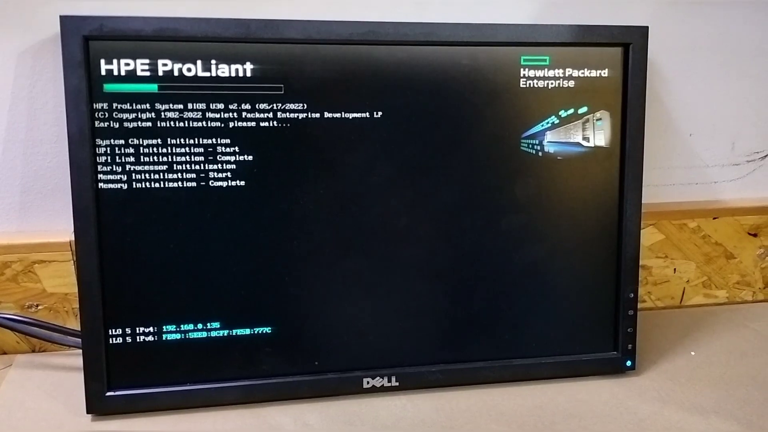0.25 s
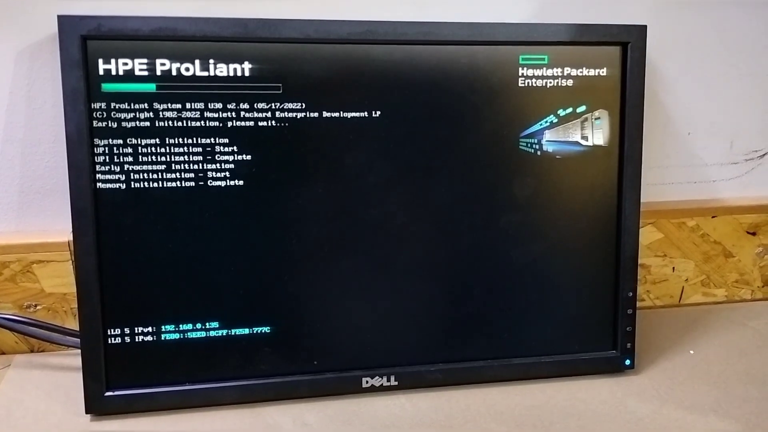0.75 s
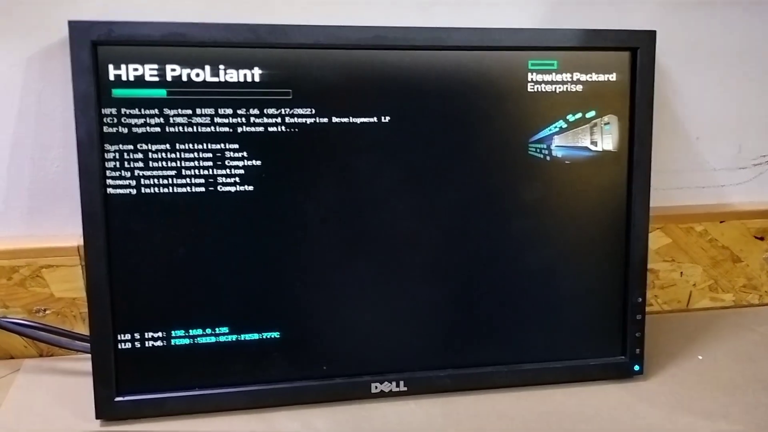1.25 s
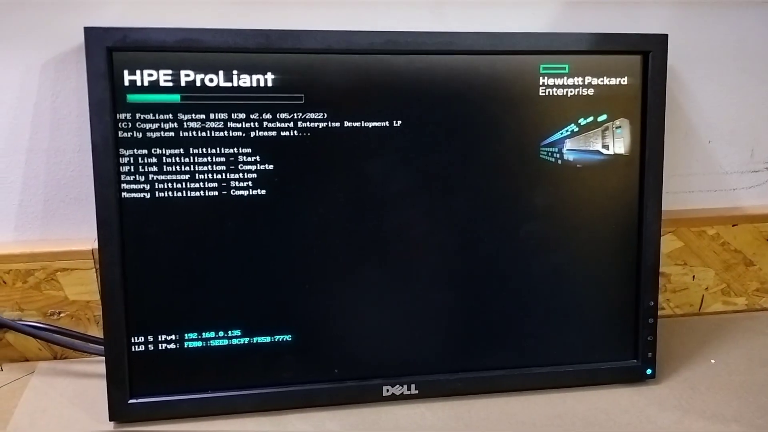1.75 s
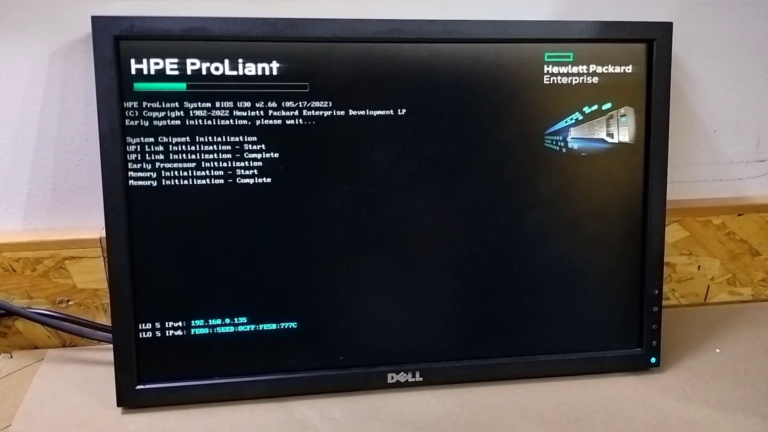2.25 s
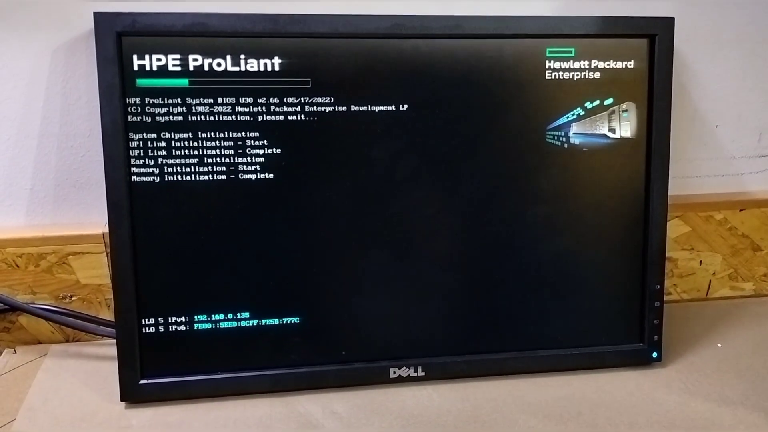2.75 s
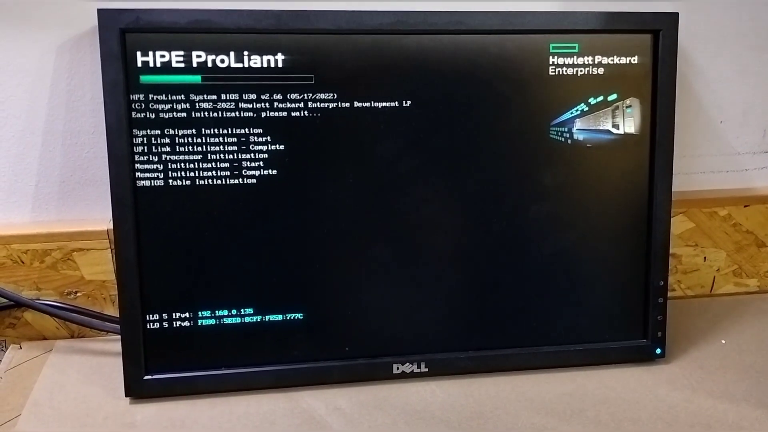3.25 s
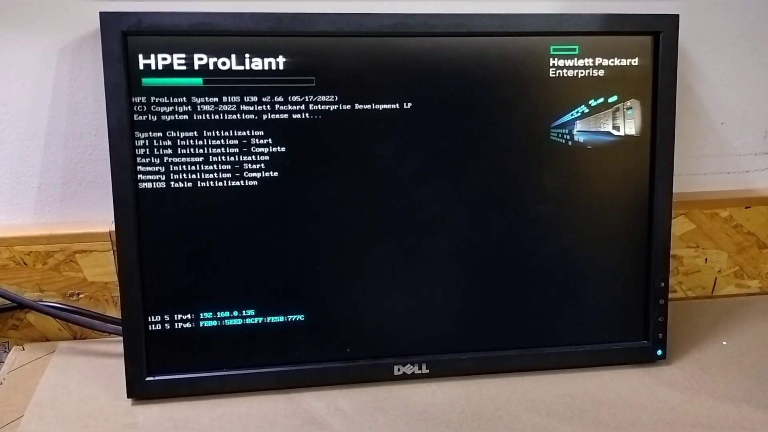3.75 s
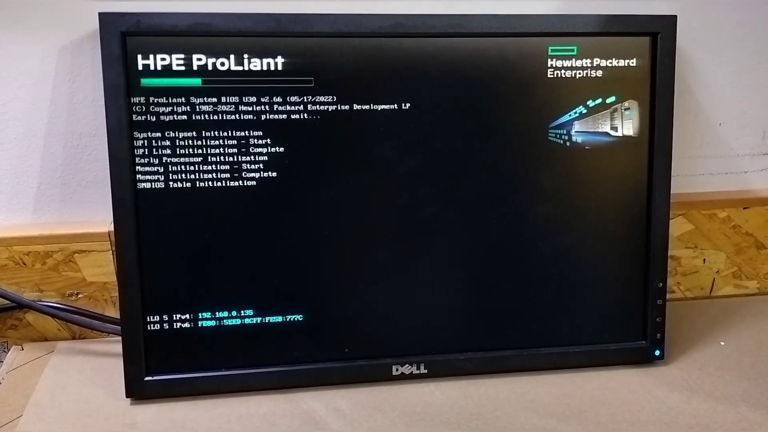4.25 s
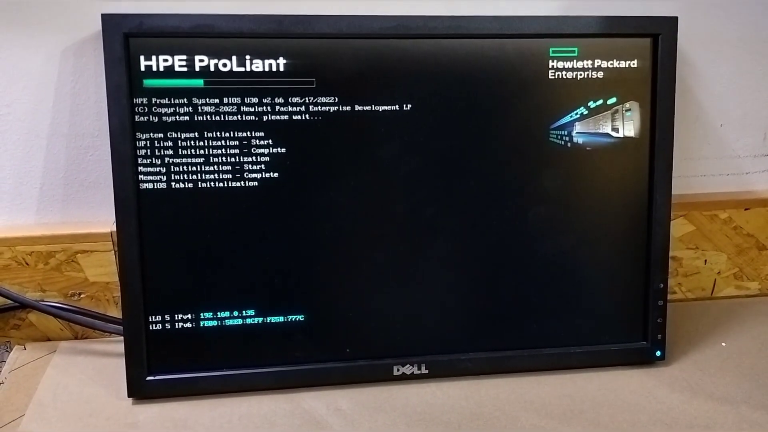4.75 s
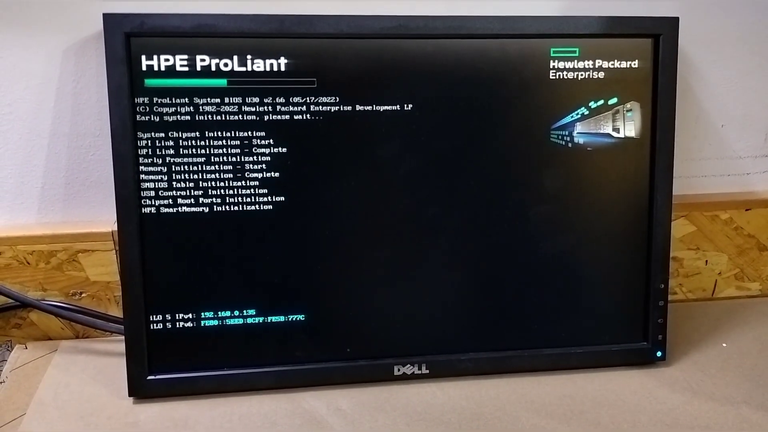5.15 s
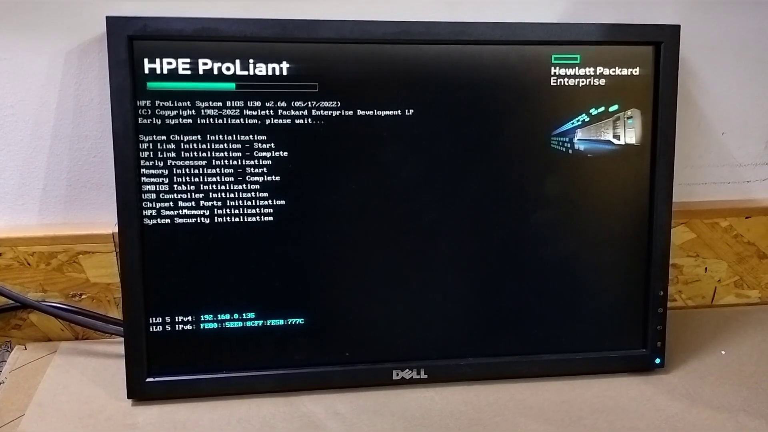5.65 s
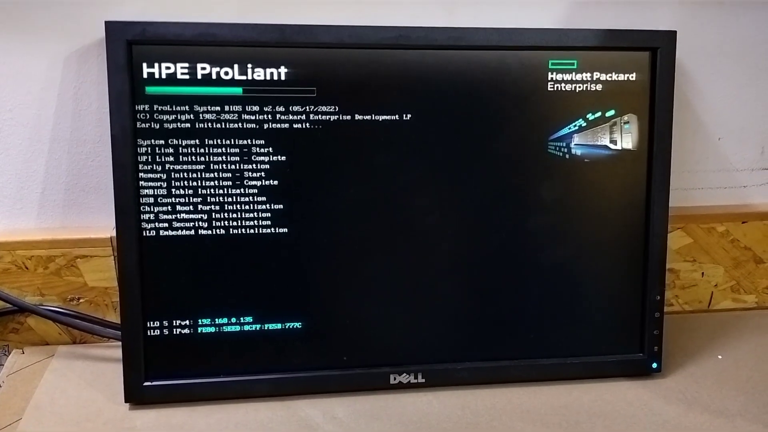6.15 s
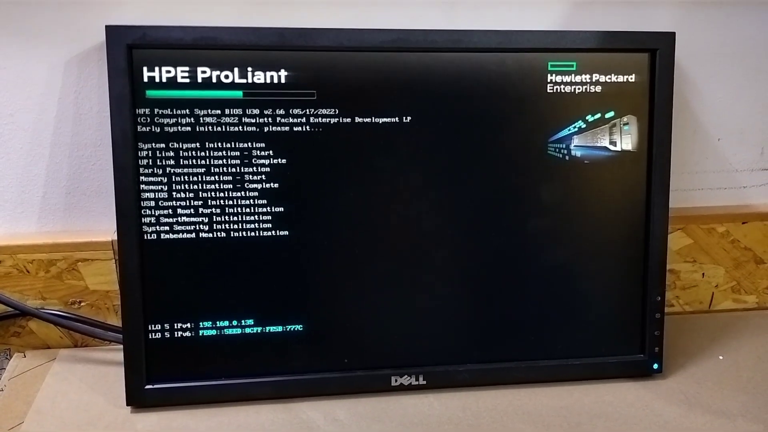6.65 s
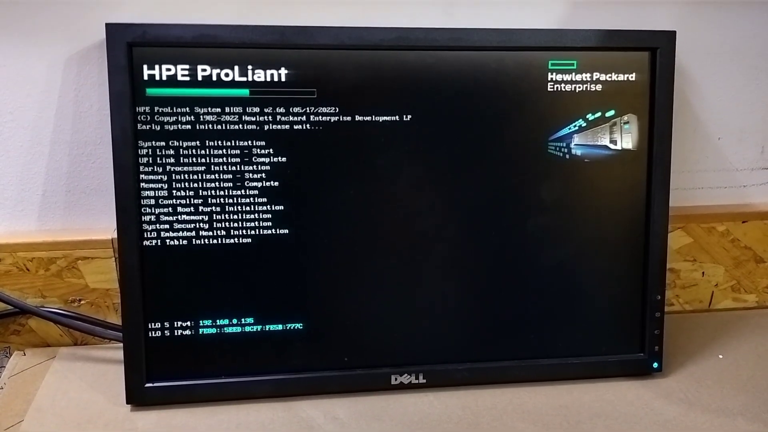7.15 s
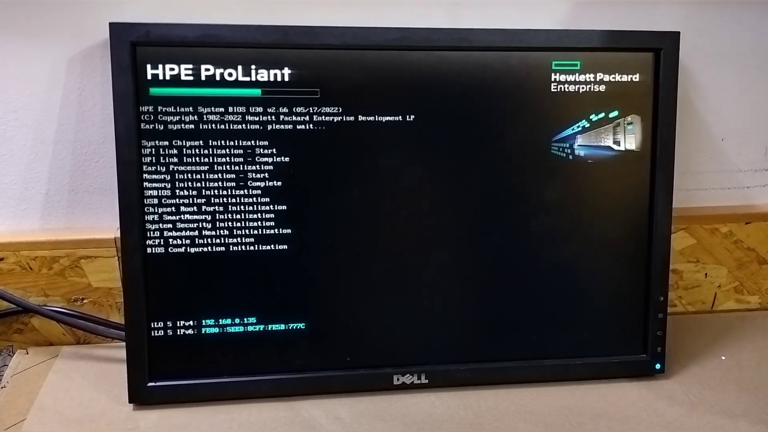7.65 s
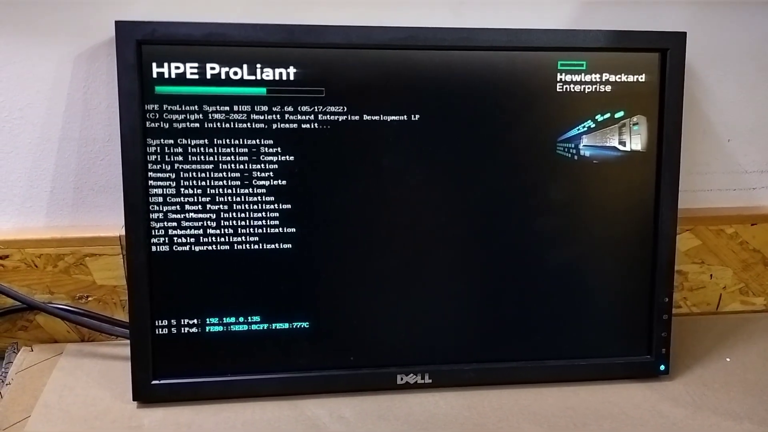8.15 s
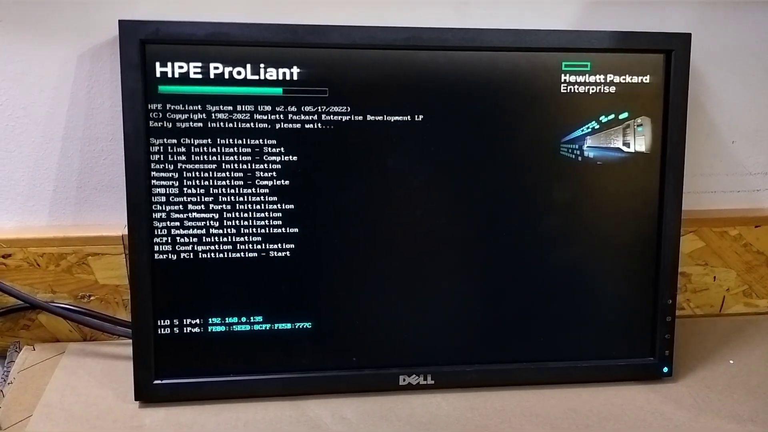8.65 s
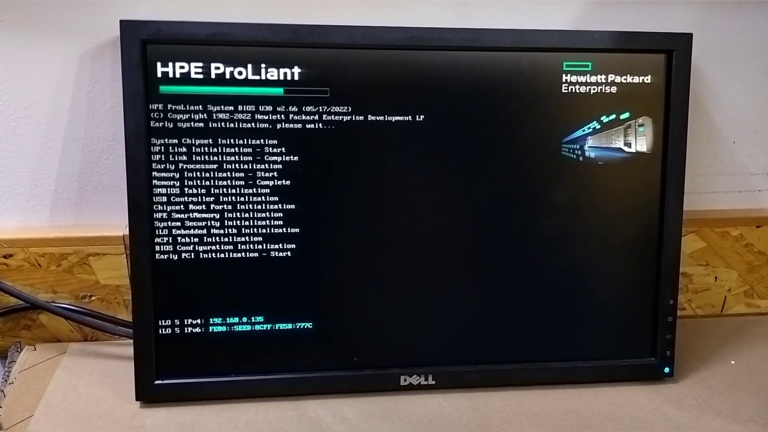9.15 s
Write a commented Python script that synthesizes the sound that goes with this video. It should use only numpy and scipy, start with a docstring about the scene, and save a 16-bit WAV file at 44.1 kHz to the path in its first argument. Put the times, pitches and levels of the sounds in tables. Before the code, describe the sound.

A constant mid-pitched fan whine throbs gently above rushing air indoors, with soft early handling bumps and a faint distant rumble near the end.

```python
"""Throughout, a beating whine sounds over a rush of air: a server's cooling fans at steady speed in a small room.
A hand-held camera with two microphones hears four five-bladed rotors, summed from multiples of their shaft speeds;
three turn at close speeds, one of them hunting, and so beat. The rush is noise coloured by case and room.
Under them lie a faint electric hum of wavering sines, two soft bumps of noise
and a far rumble, an uneven low drone that rises near the end."""
import sys
import numpy as np
from scipy import signal
from scipy.fft import rfft, irfft
from scipy.io import wavfile

SR = 44100
rng = np.random.default_rng(int(sys.argv[2]) if len(sys.argv) > 2 else 0)


def inscribe(sig):
    """Save sig as 16-bit PCM at rate SR to the path in sys.argv[1].

    A 1-D sig is mono; a 2-D sig holds one channel per row.
    Samples are clipped to [-1, 1] before scaling.
    """
    pcm = np.round(np.clip(np.atleast_2d(sig).T, -1, 1) * 32767)
    wavfile.write(sys.argv[1], SR, pcm.astype(np.int16))


N = 413658
TIME = np.arange(N) / SR


def gain_of(db):
    """Decibels to amplitude."""
    return 10 ** (np.asarray(db) / 20)


def evened(x):
    """Scales to rms 1."""
    return x / np.sqrt(np.mean(abs(x) ** 2) + 1e-20)


def drift(rate_hz):
    """Slow random wander of rms 1, whose spectrum falls off above rate_hz."""
    steps = np.arange(0, N, 128)
    hz = np.fft.rfftfreq(len(steps), steps[1] / SR)
    spectrum = rfft(rng.standard_normal(len(steps))) / (1 + (hz / rate_hz) ** 2)
    slow = irfft(spectrum, len(steps))
    return np.interp(np.arange(N), steps, evened(slow - slow.mean()))


def swell(db):
    """A level in dB over time as a gain of rms 1, so only its changes count."""
    return evened(gain_of(db))


def swells_of(rows):
    """A table of levels in dB over time as gains of rms 1, one for each level column."""
    times, *columns = np.transpose(rows)
    return np.array([swell(np.interp(TIME, times, column)) for column in columns])


def white():
    """Spectrum of white noise with unit power per Hz."""
    return rfft(rng.standard_normal(N)) * np.sqrt(SR / 2)


def tone(turns, left_db, right_db, lead):
    """One sine as the two microphones meet it in the room's standing waves."""
    angle = 2 * np.pi * turns
    left = gain_of(left_db) * np.sin(angle + lead)
    right = gain_of(right_db) * np.sin(angle)
    return np.sqrt(2) * np.array([left, right])


def rumble(steady_db=-79.5, start_hz=47.5, climb_hz_per_s=6.5, unsteady=.8):
    """Far off, a deep uneven drone swells once and climbs in pitch from the top of the swell."""
    swell_s, swell_half_s, swell_db = 7.8, 1.1, 8.5
    level_db = steady_db + swell_db * np.exp(-((TIME - swell_s) / swell_half_s) ** 2 / 2)
    hz = start_hz + climb_hz_per_s * np.maximum(TIME - swell_s, 0)
    turns = np.cumsum(hz) / SR
    uneven_level = 1 + unsteady * drift(rate_hz=5)
    drone = uneven_level * np.sin(2 * np.pi * turns + unsteady * drift(rate_hz=5))
    return gain_of(level_db) * evened(drone)


# Hum of the machine at the microphone pair:
# f/Hz, left level/dB, right level/dB, lead of the left microphone/rad
HUM_TONES = [(100.4, -72.5, -73, 0.2), (119.3, -72, -74.5, 0.1), (132.7, -66, -66, 0.1),
             (586, -55, -58, 0.2)]


def hum(waver=.002):
    """Faint low electric tones that waver a little in pitch."""
    out = np.zeros((2, N))
    for tone_hz, left_db, right_db, lead in HUM_TONES:
        hz = tone_hz * (1 + waver * drift(rate_hz=2.2))
        out += tone(np.cumsum(hz) / SR, left_db, right_db, lead)
    return out


# Soft bumps, the first with a light scuff:
# t/s, left level/dB per Hz, right level/dB per Hz, centre f/Hz, half width/octaves, half length/s
SOFT_BUMPS = [(1.38, -67, -62, 169, 0.47, 0.041), (1.385, -73, -65, 370, 0.63, 0.033),
              (2.228, -69, -75, 70, 0.41, 0.015)]


def bumps():
    """Short dull puffs of noise, each alike at both microphones but for its level."""
    hz = np.fft.rfftfreq(N, 1 / SR)
    out = np.zeros((2, N))
    for start, left_db, right_db, centre, octaves, length in SOFT_BUMPS:
        band = np.exp(-(np.log2((hz + 1) / centre) / octaves) ** 2 / 2)
        envelope = np.exp(-((TIME - start) / length) ** 2 / 2)
        out += irfft(white() * band, N) * envelope * gain_of([[left_db], [right_db]])
    return out


# The rush as the spaced microphones share it: f/Hz, likeness/0-1, lag of the left microphone/rad
MICROPHONE_LIKENESS = [(120, 0.88, -0.5), (246, 0.94, 0.34), (446, 0.79, 0), (680, .45, 2.35),
                       (720, 0.8, 0), (785, 0.6, 1.26), (1010, 0.1, 2), (1280, 0.61, 2.5), (2000, 0.2, 5.5),
                       (2660, 0.5, 7.5), (3000, 0.38, 9), (4030, 0.17, 13), (5480, 0.3, 18.5),
                       (6800, .05, 24)]


def two_microphones(hz):
    """Noise spectra for the pair: part of the left is the right one's noise, lagged; the rest is its own."""
    knots, likeness, lag = np.transpose(MICROPHONE_LIKENESS)
    likeness_at_hz = np.clip(np.interp(hz, knots, likeness), 0, 1)
    alike = likeness_at_hz * np.exp(-1j * np.interp(hz, knots, lag))
    right = white()
    left = alike * right + np.sqrt(np.maximum(1 - abs(alike) ** 2, 0)) * white()
    return np.array([left, right])


def reflections(spectrum, hz, share=0.29, onset_hz=1100, decay_s=0.028, count=2):
    """Early wall echoes comb the upper rush into fine strands, which shift as the camera sways."""
    out = np.zeros((2, N))
    for _ in range(count):
        echoes = rng.standard_normal((2, SR)) * np.exp(-TIME[:SR] / decay_s)
        comb = evened(rfft(echoes, N).real)
        out += irfft(spectrum * comb * hz / (hz + onset_hz), N) * drift(rate_hz=.5)
    return share * out / np.sqrt(count)


# Rush of air before room colour and overall level: f/Hz, left level/dB per Hz, right level/dB per Hz
AIR_COLOUR = [(25, -100.4, -102.3), (50, -99, -95), (70.0, -90.3, -92.1), (160.0, -80.3, -79.8),
              (205.0, -70.5, -69.4), (280.0, -66.8, -70.2), (345.0, -74.3, -78.8), (600.0, -71.4, -73.4),
              (900.0, -68.7, -66.4), (1500.0, -73.8, -82.8), (2000.0, -79.5, -83.2), (3900.0, -72.9, -78.7),
              (5700.0, -77.0, -84.8), (6500.0, -97.1, -100.8), (7240.0, -121, -103.9)]
# Resonances and hollows of case and room: centre f/Hz, half width/Hz, left level/dB, right level/dB
CASE_RESONANCES = [(245.0, 39.0, 2.7, 3.7), (343, 12, -3.5, -1.5), (428.0, 23.0, 5.9, 0.5),
                   (455, 18, -0.5, -3), (516.0, 24.0, 5.2, 0.4), (565, 14, -2.5, -1.5),
                   (636.0, 35.0, 0.4, 3.1), (688.0, 34.0, -0.7, 7.4), (725.0, 27.0, 8.2, 4.4),
                   (784.0, 12.0, -3.8, 1.4), (815.0, 18.0, 1.1, 5.0), (853, 9, 3, 2.5),
                   (861.0, 70.0, 5.1, -2.4), (1020, 14, -1, -4), (1055, 16, 0, 4),
                   (1083.0, 26.0, 5.0, -1.5), (1144.0, 25.0, 1.3, -4.2), (1281.0, 32.0, 0.3, 3.8),
                   (1377, 15, 3, 0), (1458, 25, 0, 2.5), (1570, 22, -3, -1), (1738.0, 87.0, 5.0, 2.2),
                   (2147, 15, 4, 0), (2238.0, 37.0, 1.1, 3.8), (2608.0, 212.0, 4.5, 4.7),
                   (2915.0, 62.0, 0.1, 5.9), (3020, 25, -3, 0), (3150, 18, 2.5, -3),
                   (3264.0, 64.0, -3.9, 1.1), (3540, 50, -3, 2), (3710, 20, 3, 0), (3762, 15, -3.5, 0),
                   (3822.0, 204.0, 4.3, 2.8), (4250, 50, 0, -2.5), (4420.0, 209.0, -3.8, -3.6),
                   (4640, 20, -3, 0), (4700, 22, 3, 1), (4884.0, 234.0, -2.4, -4.4), (5227, 30, -3, 0),
                   (5346.0, 91.0, 2.4, 0.1)]
# The rush's low middle, which hollows briefly and fills again: t/s, relative level/dB
LOW_MIDDLE = [(0, -0.5), (2.4, -1), (2.7, -3.5), (3.05, -8.5), (3.25, 0.5), (3.55, 2.5), (3.9, -0.6),
              (9.38, 0)]


def rush(level_db=0.09, gust_db=0.4, eddy_db=2.5, eddy_hz=340):
    """Turbulent air through the case, coloured by case and room; large eddies make its low end lumpy."""
    hz = np.fft.rfftfreq(N, 1 / SR)
    knots, *sides = np.transpose(AIR_COLOUR)
    colour_db = np.array([np.interp(np.log(hz + 1), np.log(knots), side) for side in sides])
    for centre, width, left_db, right_db in CASE_RESONANCES:
        colour_db += np.outer([left_db, right_db], np.exp(-((hz - centre) / width) ** 2))
    spectrum = two_microphones(hz) * gain_of(colour_db)

    low = 1 / (1 + (hz / eddy_hz) ** 4)
    lumpy_low = irfft(spectrum * low, N) * swell(eddy_db * drift(rate_hz=13))
    air = irfft(spectrum * (1 - low), N) + lumpy_low

    low_middle_band = np.exp(-((hz - 390) / 130) ** 2)  # centre and half width in Hz
    low_middle = irfft(rfft(air) * low_middle_band, N)
    air = air + low_middle * (swells_of(LOW_MIDDLE) - 1)
    air = air + reflections(spectrum, hz)
    return air * gain_of(level_db + gust_db * drift(rate_hz=4.7))


BLADES = 5
# Mean speeds of the slow and middle shafts, and of the fast one before it wavers, in turns per s
SLOW_HZ, MIDDLE_HZ, FAST_HZ = 167.0, 182.85, 183.76
# Moments at which the twin's and the fast rotor's blades line up with the middle rotor's, in s
TWIN_IN_STEP_S, FAST_IN_STEP_S = 2.016, 5.72


def turns_since(hz, start_s):
    """Turns made at the speed hz, counted from the moment start_s."""
    turns = np.cumsum(hz) / SR
    return turns - np.interp(start_s, TIME, turns)


# The middle rotor's twin hunts around its speed: t/s, shaft speed ahead of the middle rotor f/Hz
TWIN_HUNTING = [(0.0, -0.096), (0.92, 0.338), (3.55, 0.466), (4.37, -0.208), (5.17, -0.148), (6.09, -0.178),
                (6.74, 0.004), (7.23, -0.445), (8.26, -0.027), (8.72, -0.246), (9.38, -0.001)]


def shafts():
    """Turns of the slow, middle, twin and fast rotors; the last three waver together."""
    slow = np.cumsum(SLOW_HZ * (1 + .0005 * drift(rate_hz=.88))) / SR
    middle = np.cumsum(MIDDLE_HZ * (1 + .0003 * drift(rate_hz=.88))) / SR
    twin = middle + turns_since(np.interp(TIME, *np.transpose(TWIN_HUNTING)), TWIN_IN_STEP_S)
    fast = middle + (FAST_HZ - MIDDLE_HZ) * (TIME - FAST_IN_STEP_S)
    return slow, middle, twin, fast


def rotor(turns, tones, swells, leads, delays, flutter, sway_db=2.5):
    """Multiples of the shaft's turning, each delayed by its way out of the case; uneven inflow makes them flutter,
    and the short waves of the high ones come and go at each swaying microphone."""
    out = np.zeros((2, N))
    for order, left_db, right_db, lead in tones:
        # flutter is a share of the tone's amplitude
        strength = swells.get(order, 1) * evened(1 + flutter * drift(rate_hz=9.8))
        if order > 2 * BLADES and order not in swells:
            strength = strength * np.array([swell(sway_db * drift(rate_hz=1.2)) for _ in out])
        # the delay is in turns of the tone itself
        out += strength * tone(order * turns + delays[order], left_db, right_db, lead + leads.get(order, 0))
    return out


# Tones of the slow rotor before the whine's overall level:
# multiple of the shaft speed, left level/dB, right level/dB, lead of the left microphone/rad
SLOW_ROTOR_TONES = [(1, -59.7, -60.0, -0.3), (4, -52.6, -45.8, 2.8), (5, -40.4, -42.1, -0.5),
                    (10, -57.5, -72.6, -2.7), (15, -58.5, -54.6, -1.1), (20, -64.3, -63.1, 2.6)]
# Its blade tone, which firms up as the camera drifts: t/s, left and right relative level/dB
SLOW_BLADE_LEVEL = [(0, -3, -5), (0.9, -0.3, -2.5), (1.5, -2.5, -4.5), (2.3, -3.5, -4.5), (3.1, -0.5, -2),
                    (3.75, 2, -1), (3.95, -2.5, -4.5), (4.2, 0, -2.5), (4.9, 0.6, -2), (5.4, 0.3, 2.2),
                    (7.6, 0.8, 1.5), (8.2, -2, -0.5), (8.5, 1.3, 2.2), (9.38, 0.8, 3)]
# Its whistle at three times the blade tone: t/s, relative level/dB
SLOW_THIRD_LEVEL = [(0, -9), (0.4, -8), (0.7, 0), (3.4, -1), (4.5, 2), (5.9, 2), (6.8, -4), (7.8, -3),
                    (8.4, 1.5), (9.38, 1)]
# Its blade tone shifts between the microphones as the camera drifts: t/s, extra lead of the left one/rad
SLOW_BLADE_LEAD = [(0.8, -0.7), (2.7, -0.5), (4.7, 0), (9.38, -0.15)]


def slow_rotor(turns, delays):
    """The lowest-pitched rotor: its blades passing make the tone, their multiples the whistle."""
    swells = {BLADES: swells_of(SLOW_BLADE_LEVEL), 3 * BLADES: swells_of(SLOW_THIRD_LEVEL)}
    leads = {BLADES: np.interp(TIME, *np.transpose(SLOW_BLADE_LEAD))}
    return rotor(turns, SLOW_ROTOR_TONES, swells, leads, delays, flutter=0.14)


# Blade tone of the three quicker rotors at the swaying camera: t/s, left and right relative level/dB
QUICK_BLADE_LEVEL = [(0, -3.5, -4), (2.4, 1, 0), (3.4, 0, 3), (4.6, -0.5, 0), (5.05, 4.5, 2.5), (5.7, 1, 0),
                     (6.4, 3, 1.5), (7.0, 0.5, -0.5), (8.6, 0.5, -1), (9.38, 4, 3)]


def quick_blade_swell():
    """The rise and fall that the blade tones of the three quicker rotors share."""
    return swells_of(QUICK_BLADE_LEVEL)


# Tones of the middle rotor and of its twin before the whine's overall level:
# multiple of the shaft speed, left level/dB, right level/dB, lead of the left microphone/rad
MIDDLE_ROTOR_TONES = [(1, -61.5, -62.1, -0.6), (2, -71.1, -73.7, -0.5), (3, -71.9, -74.1, 1.4),
                      (4, -51.5, -58.3, -0.4), (5, -40.9, -47.6, 1.9), (10, -50.6, -63.4, 1.3),
                      (15, -57.7, -63.6, 2.7), (20, -57, -64.5, -0.8), (25, -60.3, -66.5, 0.9)]
TWIN_ROTOR_TONES = [(4, -56, -63, -0.4), (5, -47, -57.5, 1.7), (10, -51.3, -65.3, 1.2), (15, -63, -67, 2.7),
                    (20, -58.5, -64, -0.8), (25, -62, -68, 0.9)]
# The pair at two, four and five times their blade tone: t/s, relative level/dB
PAIR_OCTAVE_LEVEL = [(0, 1), (0.8, 2.5), (2.0, 1), (2.75, 2), (3.4, -2), (3.85, 3.5), (4.45, 3.2), (5.0, 0),
                     (6.3, 0), (6.6, -10), (7.2, -8), (7.4, -4), (7.7, -6), (8.7, -0.5)]
PAIR_FOURTH_LEVEL = [(0, -1), (0.8, 1), (3.5, 0), (4.5, -2), (6.3, -1), (6.9, 5), (7.4, 0), (8.2, 3),
                     (8.7, -5)]
PAIR_FIFTH_LEVEL = [(0, 0), (0.7, 2), (1.5, -1), (2.8, -1), (3.4, 4), (4.4, 3.5), (5.2, -0.5), (6.2, 0.5),
                    (6.85, -8), (7.4, -1), (8.7, 1.5)]


def middle_pair(middle, twin, delays):
    """Two rotors beat as one hunts; the twin's octave is inverted and nearly cancels when their blades line up."""
    octave = swells_of(PAIR_OCTAVE_LEVEL)
    middle_swells = {BLADES: quick_blade_swell(), 2 * BLADES: octave,
                     4 * BLADES: swells_of(PAIR_FOURTH_LEVEL), 5 * BLADES: swells_of(PAIR_FIFTH_LEVEL)}
    twin_swells = {**middle_swells, 2 * BLADES: -octave}
    return (rotor(middle, MIDDLE_ROTOR_TONES, middle_swells, {}, delays, flutter=0.09)
            + rotor(twin, TWIN_ROTOR_TONES, twin_swells, {}, delays, flutter=0.09))


# Tones of the fast rotor before the whine's overall level:
# multiple of the shaft speed, left level/dB, right level/dB, lead of the left microphone/rad
FAST_ROTOR_TONES = [(1, -53.6, -55.3, -0.2), (2, -61.2, -62.3, -0.5), (3, -62.1, -62.6, 0.6),
                    (4, -50, -58.2, -0.4), (5, -52.5, -51.2, -3.1), (10, -65, -75, 0.4),
                    (15, -57.4, -52.4, 2.2), (20, -61.8, -56.2, -3.1), (25, -66.2, -73.6, -1.0)]
# Its thin whistle at three times the blade tone: t/s, left and right relative level/dB
FAST_THIRD_LEVEL = [(0, 1, 0), (0.9, 6, 2), (1.7, 3, 3), (2.6, 1, 3), (3.4, 1, 1), (4.4, -6, -3),
                    (6.6, -4, -1), (7.7, -8, -2), (9.38, 0, 0)]


def fast_rotor(turns, delays):
    """Its constant lead in speed over the middle rotor gives an even throb."""
    swells = {BLADES: quick_blade_swell(), 3 * BLADES: swells_of(FAST_THIRD_LEVEL)}
    return rotor(turns, FAST_ROTOR_TONES, swells, {}, delays, flutter=0.25)


def whine(level_db=-0.45):
    """The four rotors together: close speeds drift in and out of step, so their tones beat."""
    slow, middle, twin, fast = shafts()
    delays = rng.random(size=26)  # one for each multiple, the same for all rotors
    rotors = slow_rotor(slow, delays) + middle_pair(middle, twin, delays) + fast_rotor(fast, delays)
    return gain_of(level_db) * rotors


def scene():
    """Hum, bumps, air and whine in stereo, the far rumble in the middle."""
    return rumble() + hum() + bumps() + rush() + whine()


def record(dry, edge_hz=7400):
    """A steep upper band limit near 7.4 kHz, by a linear-phase low-pass."""
    low_pass = signal.firwin(511, edge_hz, window=("kaiser", 9), fs=SR)
    return signal.oaconvolve(dry, low_pass[None], "same")


dry = scene()
out = record(dry)
inscribe(out)
```